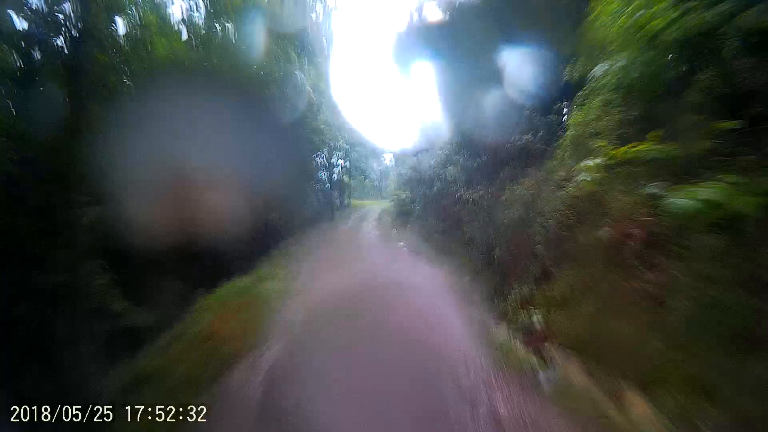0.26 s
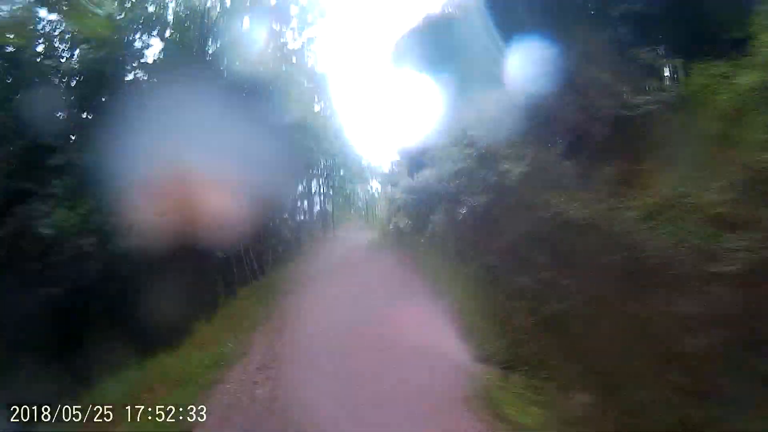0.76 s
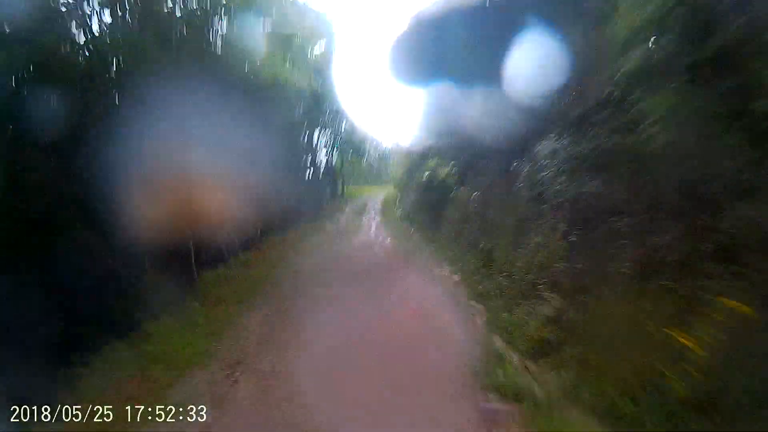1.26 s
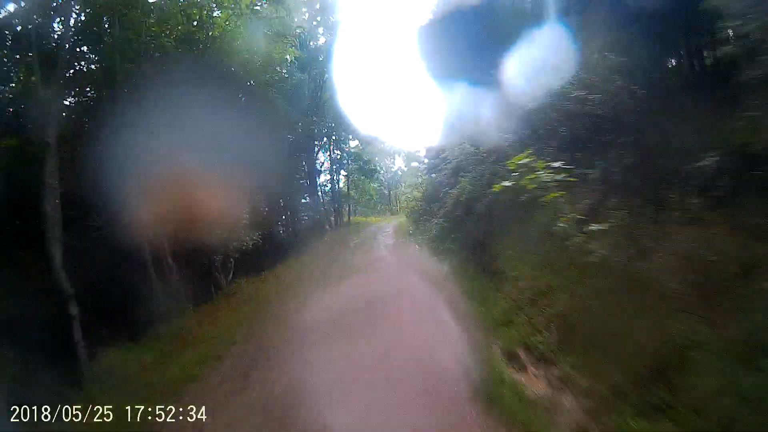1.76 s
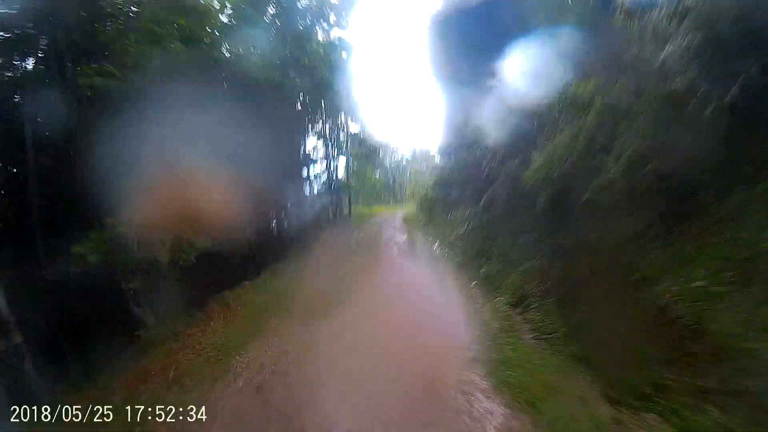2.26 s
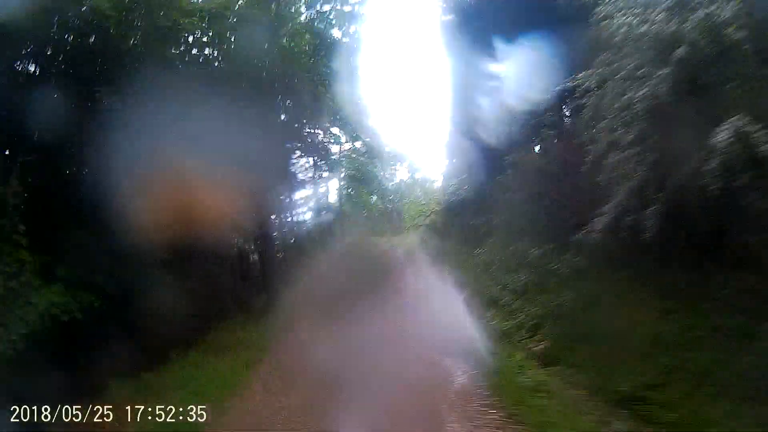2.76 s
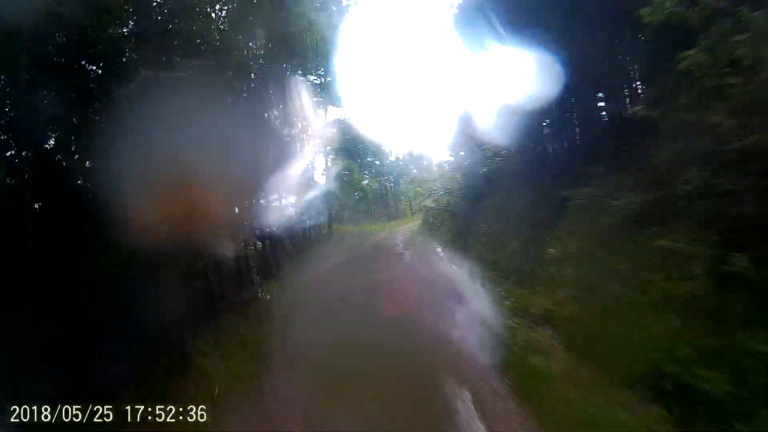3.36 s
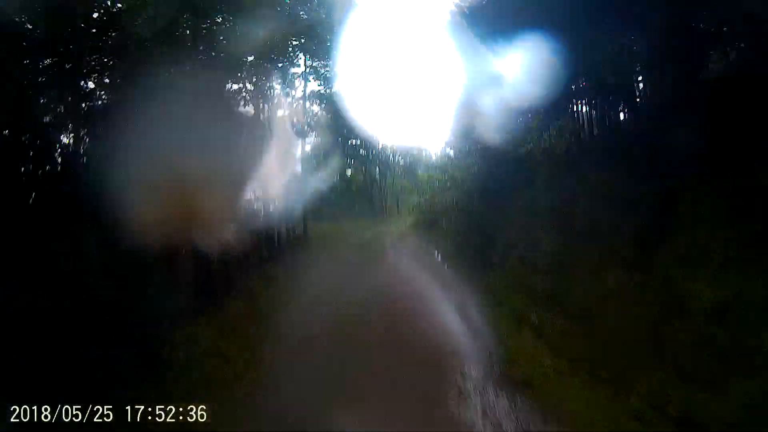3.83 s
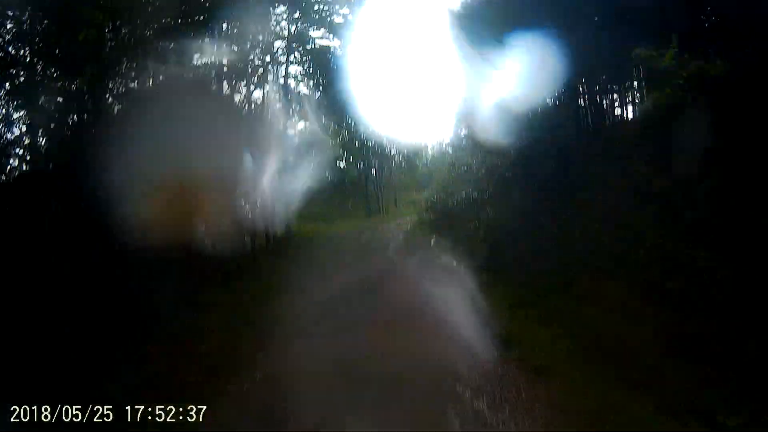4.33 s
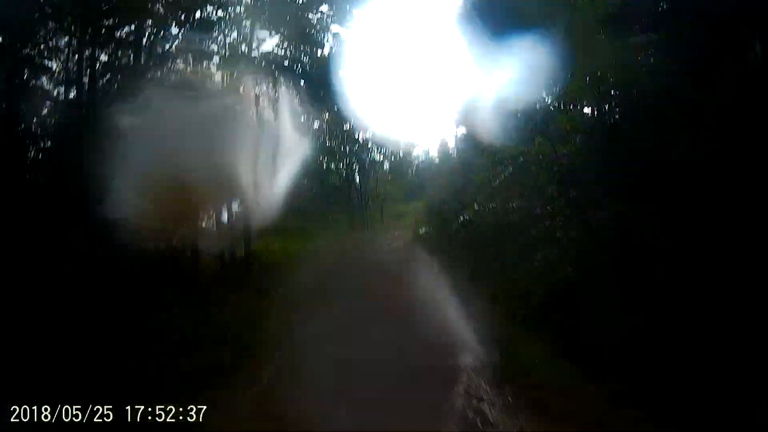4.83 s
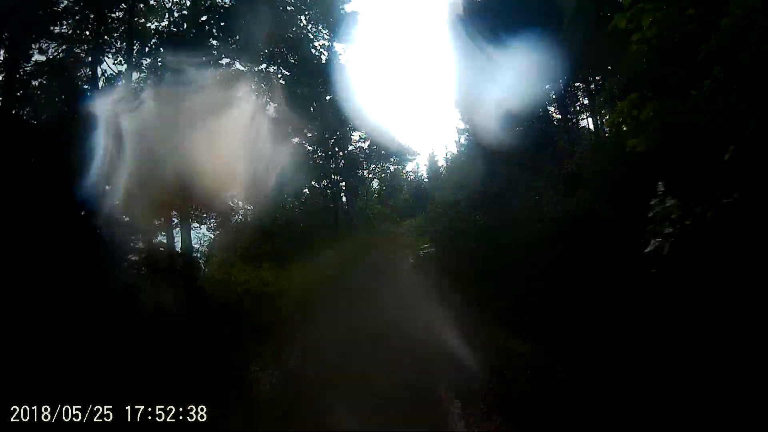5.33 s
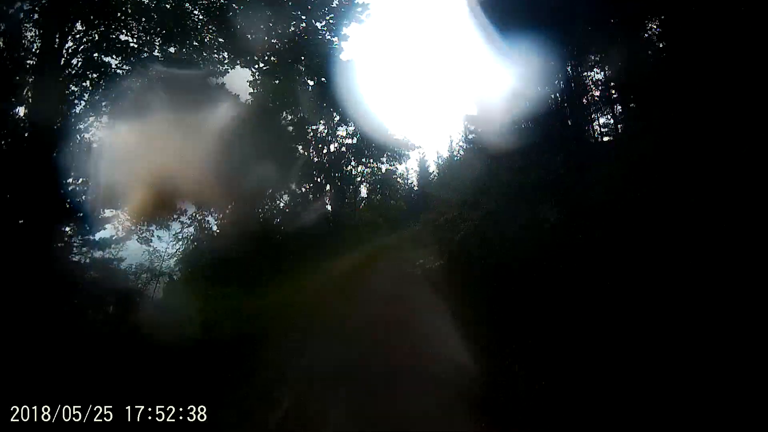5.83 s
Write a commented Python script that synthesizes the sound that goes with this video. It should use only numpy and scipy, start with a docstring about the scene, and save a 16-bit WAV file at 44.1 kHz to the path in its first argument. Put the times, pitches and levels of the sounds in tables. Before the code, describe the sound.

Boxy, close gravel crunch from a speeding bike, with low frame rumble, pebble pops, sharp knocks and one very loud rattle midway.

```python
"""Tyres crunch grit and hiss on a wet gravel track as a bicycle rolls fast, heard inside a closed case on the bike.
Random trains of tiny impacts, coloured as heard in the case, swell with the load on each hump and thin on rebound.
Stones, pebbles and loose parts strike the case: each blow excites its resonances and disperses as bending waves.
Slow pulses make the jolts of the frame; low-frequency noise makes its sway and the buffeting air."""
import sys
import numpy as np
from scipy import signal
from scipy.fft import rfft, irfft
from scipy.io import wavfile
from scipy.ndimage import uniform_filter1d

SR = 44100
rng = np.random.default_rng(int(sys.argv[2]) if len(sys.argv) > 2 else 0)


def transcribe(u):
    """Save the signal u as a 16-bit wav file named by the first command-line argument.

    u: samples, shape (n,) or (channels, n), limited to [-1, 1]; the rate is SR.
    q: integer samples, one column per channel.
    """
    v = np.clip(np.atleast_2d(u).T, -1, 1)
    q = np.round(v * 32767).astype(np.int16)
    wavfile.write(sys.argv[1], SR, q)


N = 268436
T = np.arange(N) / SR  # time [s]

# jolts of the frame on the sharpest bumps:
# (time [s], level of the thump [dB], swing as a share of the thump [ratio])
FRAME_JOLTS = [(1.048, -31, 0.24), (1.346, -18, 0.3), (1.452, -19.5, 0.62), (2.165, -19, 0.82),
               (3.601, -38, 0.32), (3.893, -26, 1.1), (5.24, -29, 1.4)]


def undb(db):
    """Level to amplitude: 20 dB is a factor of ten."""
    return 10 ** (np.asarray(db) / 20)


def unit(x):
    """Normalise by the root mean square, so that x has rms 1."""
    return x / np.sqrt(np.mean(x ** 2))


def bell(at_s, half_s):
    """Gaussian envelope of peak 1 and standard deviation half_s."""
    return np.exp(-((T - at_s) / half_s) ** 2 / 2)


def walk(rate):
    """Slow random modulation: random levels, rate of them a second, joined smoothly to rms about 1."""
    hold = max(int(SR / rate), 2)
    steps = np.repeat(rng.standard_normal(N // hold + 1), hold)
    return unit(uniform_filter1d(steps, hold))[:N]


def colour(x, points):
    """Linear filtering: weight the spectrum by (frequency [Hz], level [dB]) points, then set rms 1."""
    hz, db = np.transpose(points)
    f = np.maximum(np.fft.rfftfreq(N, 1 / SR), 1)
    gain = undb(np.interp(np.log(f), np.log(hz), db))
    return unit(irfft(rfft(x) * gain, N))


def grit(per_s, spread_db):
    """Shot noise: random impulses with a tail of strong ones, or of weak ones if the spread is negative."""
    size = undb(spread_db * np.minimum(rng.exponential(size=N), 5))
    struck = rng.random(N) < per_s / SR
    return unit(struck * size * rng.choice([-1, 1], N))


def rumble(shake_db, sway_db, buffet_db=2):
    """Low-frequency noise: slow sway below 20 Hz; above it frame shake and air buffeting in quick puffs."""
    # buffeting and frame shake: (frequency [Hz], relative level [dB])
    rumble_spectrum = [(3, -11), (7, 9), (12, 10), (17, 1), (25, -1), (40, -0.5), (70, -19), (140, -20.5),
                       (250, -35.5), (600, -62)]
    noise = colour(rng.standard_normal(N), rumble_spectrum)
    sway = signal.sosfiltfilt(signal.butter(4, 20, fs=SR, output="sos"), noise)
    buffeting = unit(noise - sway) * undb(shake_db + buffet_db * walk(rate=39))
    return unit(sway) * undb(sway_db) + buffeting


def jolts(width_s=0.0018, settle_s=0.021):
    """Transient pressure pulse: it builds as the bike meets a bump, peaks in a soft thump and swings back."""
    out = np.zeros(N)
    for s, db, rebound in FRAME_JOLTS:
        t = T - s
        swing = -np.tanh(2 * (t - width_s) / width_s) * np.exp(-np.abs(t) / settle_s)
        thump = np.exp(-(t / width_s) ** 2)
        out += undb(db) * (thump + .5 * rebound * swing)
    return out


def wet_hiss(load_db, level_db=-64, per_load=1, full_load_db=1):
    """White noise of the wet tread: it fades as the tyres go light and saturates above full_load_db."""
    return undb(level_db + per_load * np.minimum(load_db, full_load_db)) * rng.standard_normal(N)


def case_gain(hz, detune=0.042, uneven_db=4):
    """Modal resonance: each struck spot excites the case's modes at slightly different pitch and strength."""
    # ring of the case and its mount: (frequency [Hz], level [dB], t60 [s]), before the random variation
    case_modes = [(413, -10, 0.022), (572, -0.5, 0.038), (770, -23.5, 0.036), (920, -3, 0.0094),
                  (1305, -1, 0.033), (1565, -4, 0.017), (1815, 1, 0.021), (2277, -4.5, 0.027),
                  (2940, -4, 0.0091), (3550, -10, 0.0072), (4480, -14.5, 0.015), (5620, -18.5, 0.0052),
                  (6900, -8.5, 0.0056), (7900, -12, 0.0027), (10230, -14.5, 0.0019)]
    centre, db, t60 = np.transpose(case_modes)[:, :, None]
    pitch, size = rng.standard_normal((2, len(case_modes), 1))
    centre = centre * (1 + detune * pitch)
    q = np.pi * centre * t60 / np.log(1000)
    detuning = q * (hz / centre - centre / hz)
    mode_power = undb(db + uneven_db * size) ** 2 / (1 + detuning ** 2)
    return np.sqrt(np.sum(mode_power, axis=0))


def ringing(gain):
    """Minimum phase by the folded cepstrum: the response with this gain starts at once and dies away."""
    cepstrum = irfft(np.log(gain + 1e-9))
    half = len(cepstrum) // 2
    cepstrum[1:half] *= 2
    cepstrum[half + 1:] = 0
    return np.exp(rfft(cepstrum))


def bending(hz, lag_s=0.000346, at_hz=1500):
    """Dispersion: bending waves cross the mount at a speed growing as root frequency; the tick leads the knock."""
    return np.exp(-4j * np.pi * lag_s * np.sqrt(at_hz * hz))


def strike(levels_db, chatter_ms, size=2048, rebound=0.65, crumble=0.27, crumble_s=0.0014,
           crumble_hz=2400, tick_top_hz=11600):
    """Impact excitation: contact force times case response, its energy in each register set as if over 10 ms."""
    # registers of thud, knock, click and tick: (low edge [Hz], high edge [Hz])
    registers = [(300, 1000), (1000, 2400), (2400, 6000), (6000, 16000)]
    hz = np.maximum(np.fft.rfftfreq(size, 1 / SR), 1)
    gain = case_gain(hz) / np.sqrt(1 + (hz / tick_top_hz) ** 12)

    # a part whose chatter exceeds 1 ms touches four more times in quick succession
    lag, force = rng.random((2, 4, 1))
    delay_s = (np.arange(4)[:, None] + lag) / 4 * chatter_ms / 1000
    force = rebound * (.5 + force) * np.sign(rng.standard_normal(force.shape)) * (chatter_ms > 1)
    touches = np.sum(force * np.exp(-2j * np.pi * hz * delay_s), axis=0)
    # sand crushed at the point of contact roughens the treble
    sand = rfft(crumble * rng.standard_normal(size) * np.exp(-T[:size] / crumble_s))
    contact = 1 + touches + sand / (1 + (crumble_hz / hz) ** 2)

    # lift each register from its present level towards the wanted one
    power = np.abs(gain * contact) ** 2 * 2 / size / (SR / 100)
    lift_db = []
    for db, (lo, hi) in zip(levels_db, registers):
        present_db = 10 * np.log10(power[(hz >= lo) & (hz < hi)].sum())
        lift_db.append(db - present_db)
    # the lift is flat inside each register and glides across its edges
    corners = np.ravel(np.array(registers) * [1.2, 1 / 1.2])
    gain = gain * undb(np.interp(np.log(hz), np.log(corners), np.repeat(lift_db, 2)))
    return irfft(ringing(gain) * contact * bending(hz))


def blows(rows):
    """Superposition of strikes: rows of (time [s], four register levels [dB], chatter [ms])."""
    out = np.zeros(N + SR)
    for s, *levels_db, chatter_ms in rows:
        blow = strike(levels_db, chatter_ms)
        start = max(int((s - .0002) * SR), 0)
        out[start:start + len(blow)] += blow
    return out[:N]


def rattles(tick_db=-20.5):
    """Soft contact: loose parts land with a dull knock, often chattering; heft adds thud, and ticks stay weak."""
    # loose parts: (time [s], knock level [dB], heft: thud over knock [dB],
    # hardness: click over knock [dB], chatter of the contact [ms])
    rattle_table = [(0.5991, -36, -12, -14, .5), (1.1546, -23, -1, -22, 1.96), (1.2318, -34, -7, -13, .5),
                    (1.481, -31, -13, -11.5, .5), (1.6702, -34.5, -20, -21, .5),
                    (1.6899, -33.5, -3.5, -24, .5), (1.899, -28.5, -10.5, -14.5, 7),
                    (2.1234, -32, -6, -13, .5), (2.1964, -29.5, -8.5, -24, .5),
                    (2.5453, -31, -14.5, -16, .5), (2.8075, -19.5, -24, -21, 0.86),
                    (2.945, -23.5, -14, -24, 1.27), (3.0077, -18, -14, -21, 5.9),
                    (3.0266, -5.5, -16, -22.5, 2.35), (3.116, -21.5, -14.5, -17.5, 3.67),
                    (3.2067, -31, -3, -7.5, 2.8), (3.3293, -23, -15, -23, 5.54),
                    (3.3782, -29, -2.5, -23, 1.9), (3.4535, -25, -14, -24, 2.4),
                    (3.8663, -33.5, -7, -10, 2.74), (4.823, -28.5, -5.5, -12.5, 6),
                    (5.1472, -41, -5, -20, .5), (5.197, -35, -6, -20.5, 8), (5.616, -42.5, -5.5, -19, .5),
                    (5.825, -36.5, -8, -14, 3.1), (5.8694, -33, -10, -14.5, .5), (5.9161, -40, -7, -19, .5)]
    rows = []
    for s, db, heft_db, hardness_db, chatter_ms in rattle_table:
        click_db = db + hardness_db
        rows.append((s, db + heft_db, db, click_db, click_db + tick_db, chatter_ms))
    return blows(rows)


def stones(thud_db=-11.5, tick_db=-10, tick_per_hardness=1):
    """Hard contact: each flung stone touches once; the harder it is, the further its snap reaches upwards."""
    # flung stones: (time [s], knock level [dB], hardness: click over knock [dB])
    stone_table = [(0.0254, -40.5, 5), (0.33, -48, 2.5), (0.3647, -32, -2), (0.459, -40, -6.5),
                   (0.5464, -51.5, 3), (1.0255, -23.5, -7.5), (1.089, -12.5, -10), (1.185, -41.5, -4),
                   (1.2578, -26, -8.5), (1.3109, -39.5, -1.5), (1.4179, -19, -6), (1.5856, -35, -2.5),
                   (1.8873, -32, -4.5), (2.2125, -40.5, -2), (2.2663, -39.5, 1.2), (2.748, -28.5, -4),
                   (3.1413, -49.5, 1), (3.41, -31, -2.5), (3.5053, -30, -0.1), (4.2615, -41.5, -3.5),
                   (4.7754, -35, -3), (4.8048, -52, 4), (5.3365, -41.5, -15), (5.568, -46, -11),
                   (5.8031, -40, 1.5)]
    rows = []
    for s, db, hardness_db in stone_table:
        click_db = db + hardness_db
        # thud is set against knock, tick against click
        stone_tick_db = click_db + tick_db + tick_per_hardness * hardness_db
        rows.append((s, db + thud_db, db, click_db, stone_tick_db, 0))
    return blows(rows)


def pebbles(crunch_db, spray_db, count=240, knock_db=-8.5, click_db=-8.5, tick_db=-11,
            strong_db=12.5, hardness_db=11):
    """Random impacts: small stones pop, mostly faint, dull or bright, and louder where the track is rough."""
    when, weight, hardness, chatter_ms = (rng.random((count, 4)) * [1, 1, 1, 3]).T
    at = (when * N).astype(int)
    force_db = strong_db * weight ** 3  # the cube keeps most of them faint
    bright_db = hardness_db * (hardness - .5)
    knock = crunch_db[at] + knock_db + force_db
    click = spray_db[at] + click_db + force_db + bright_db
    tick = click + tick_db + bright_db
    return blows(np.column_stack([T[at], knock - 9, knock, click, tick, chatter_ms]))


def splash(at_s=1.456, width_s=0.044, db=-57, lo_hz=4500, hi_hz=11000):
    """Band-limited shot noise: a tyre cuts through a wet patch and throws a short fizz of droplets."""
    band = signal.butter(4, [lo_hz, hi_hz], "band", fs=SR, output="sos")
    fizz = signal.sosfilt(band, grit(per_s=3300, spread_db=4.5))
    return unit(fizz) * undb(db) * bell(at_s, width_s)


def tyre_load(uneven_db=0.5, rebound_s=0.14, light_s=0.039):
    """Load and rebound: most humps press the tyres down, and the load shifts again rebound_s later, in dB."""
    # humps: (time [s], extra load [dB], half-length [s], unloading on the rebound [dB]);
    # a negative load lightens, a negative unloading presses
    hump_table = [(0.174, 0, 0.039, 4.5), (0.328, 4, 0.032, 6.5), (0.684, 4.5, 0.035, 1),
                  (0.97, 4.5, 0.063, .5), (1.389, 4.5, 0.058, -2), (1.952, 3.5, 0.056, -2),
                  (2.166, 4.5, 0.032, -0.5), (2.444, 3, 0.029, -0.5), (2.75, 5.5, 0.041, -5.8),
                  (2.944, -1, .04, 3.5), (3.212, 5.5, 0.014, 0.5), (3.36, 3.2, 0.025, 0),
                  (3.628, 2.5, 0.12, 3.5), (3.872, 4.5, 0.031, -2), (4.022, 3, 0.059, 1),
                  (4.242, 3.5, 0.031, 0.7), (4.59, 2, 0.033, -1), (4.835, 7.5, 0.033, -0.5),
                  (5.215, 3.5, 0.08, 2.7), (5.41, 2, 0.025, 1), (5.834, 4.5, 0.044, 3),
                  (6.08, 2, 0.026, .3)]
    load_db = uneven_db * walk(rate=14)
    for s, press_db, half_s, lift_db in hump_table:
        load_db += press_db * bell(s, half_s)
        load_db -= lift_db * bell(s + rebound_s, light_s)
    return load_db


def tyres(crunch_db, spray_db, patch_db=1.41, spurt_db=1.6):
    """Modulated shot noise: grit cracks under the tread in patches; fine sand and spray hiss in short spurts."""
    # tyre noise as it reaches the inside of the case: (frequency [Hz], relative level [dB])
    crunch_spectrum = [(120, -4.5), (250, -7.5), (340, -6.5), (420, -1.5), (480, -6), (590, -5), (770, -11),
                       (950, -8), (1100, -5.5), (1300, -2), (1600, -1), (1880, -5.5), (2080, -14),
                       (2300, -13), (2480, -31), (4000, -44)]
    # fine wet spray and rushing air: (frequency [Hz], relative level [dB])
    spray_spectrum = [(1500, -5), (2500, -3), (2900, 3.5), (3250, -3), (3650, -2), (4100, -7.5),
                      (5650, -10), (6300, -13), (10000, -22.5), (16000, -40)]
    patches, spurts = walk(rate=50), walk(rate=80)
    crunch = colour(grit(per_s=2800, spread_db=1.5), crunch_spectrum)
    spray = colour(grit(per_s=8000, spread_db=-1.0), spray_spectrum)
    crunch = crunch * undb(crunch_db + patch_db * patches)
    return crunch + spray * undb(spray_db + patch_db * patches + spurt_db * spurts)


def scene():
    """Common excitation: track and load drive crunch, spray, hiss and rumble; knocks and jolts are superposed."""
    # coarseness of the track, the level that the layers are set against: (time [s], level [dB])
    track = [(0.0, -43), (0.36, -42), (1.17, -41), (2.4, -47), (3.45, -43.5), (4.17, -48), (4.47, -45.5),
             (5.42, -51), (6.08, -45.5)]
    track_db, load_db = np.interp(T, *np.transpose(track)), tyre_load()
    crunch_db, spray_db = track_db + 0.95, track_db - 14
    rolling = tyres(crunch_db + load_db, spray_db + load_db) + splash()

    # the frame shudders around each jolt
    shudder_db, shudder_lead_s, shudder_s = 8, 0.021, 0.025
    shudder = shudder_db * sum(bell(s - shudder_lead_s, shudder_s) for s, _, _ in FRAME_JOLTS)
    # shaking and sway follow the load more steeply than the crunch does [dB per dB]
    shake_per_load, sway_per_load = 2.04, 1.8
    shake_db = track_db - 2.5 + shake_per_load * load_db + shudder
    sway_db = track_db + 11.5 + sway_per_load * load_db
    shaking = jolts() + rumble(shake_db, sway_db)

    knocks = pebbles(crunch_db, spray_db) + stones() + rattles()
    return (rolling + knocks + shaking + wet_hiss(load_db))[None]


def record(dry, ceiling=0.81, top_hz=15600):
    """Saturation and low-pass: the hardest knocks overload the microphone; the top rolls off and is cut."""
    held = dry / (1 + (dry / ceiling) ** 12) ** (1 / 12)
    low_pass = signal.firwin(101, top_hz, fs=SR, window="blackman")
    return signal.fftconvolve(held, low_pass[None], "same")


dry = scene()
out = record(dry)
transcribe(out)
```